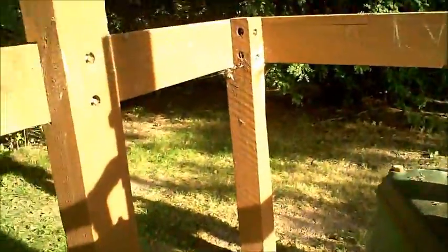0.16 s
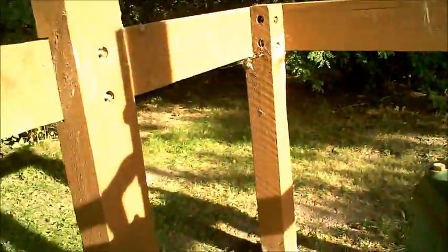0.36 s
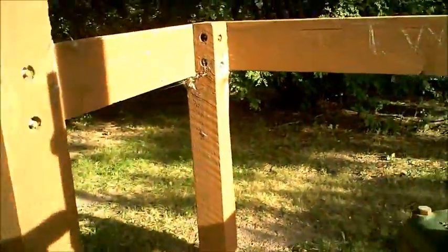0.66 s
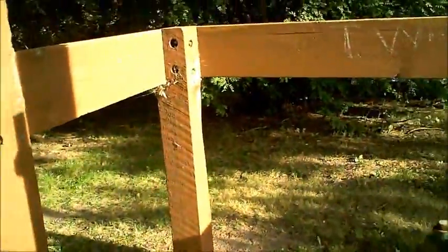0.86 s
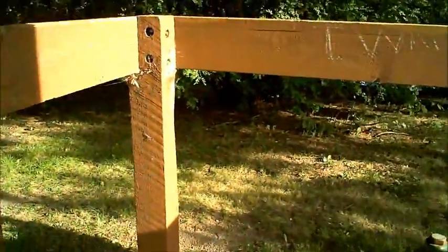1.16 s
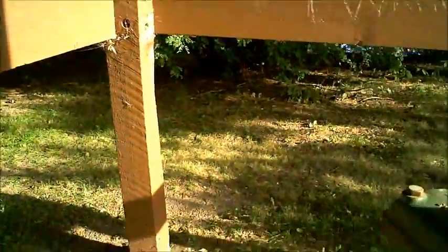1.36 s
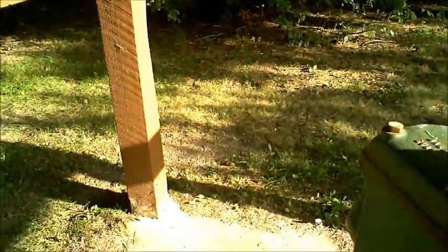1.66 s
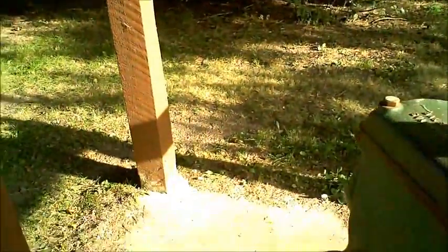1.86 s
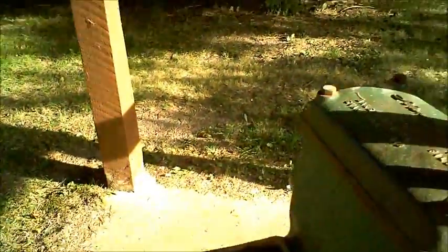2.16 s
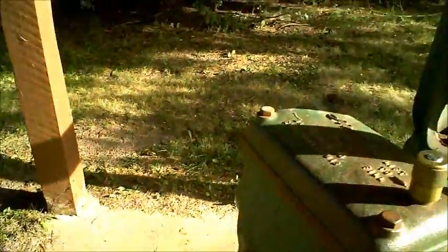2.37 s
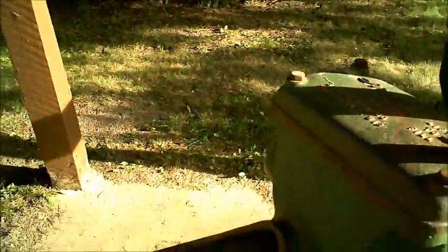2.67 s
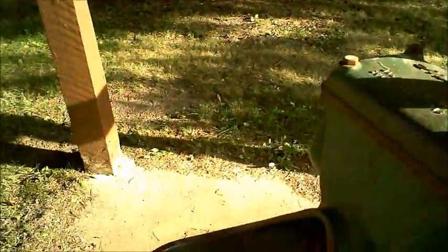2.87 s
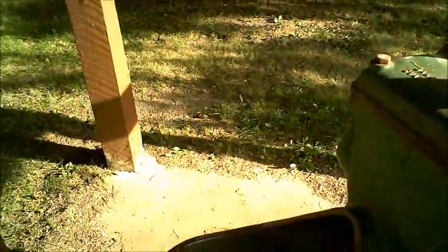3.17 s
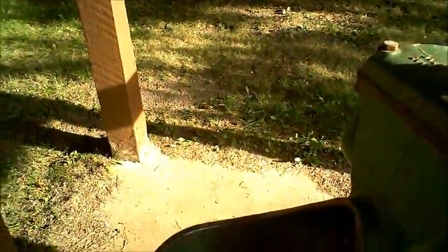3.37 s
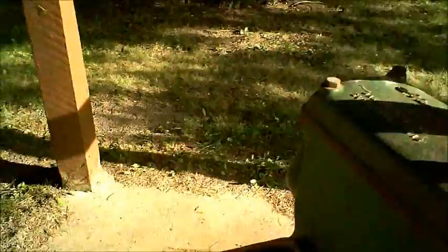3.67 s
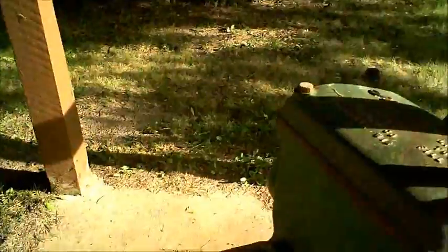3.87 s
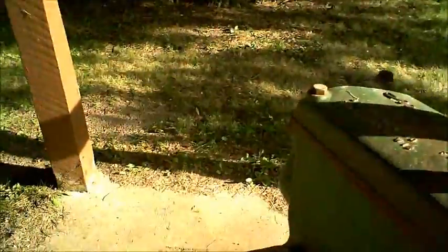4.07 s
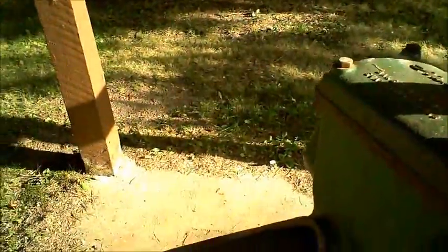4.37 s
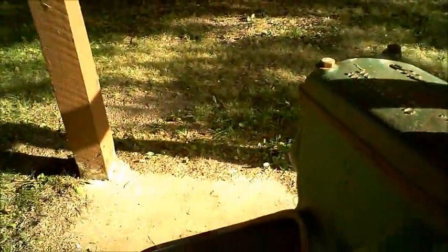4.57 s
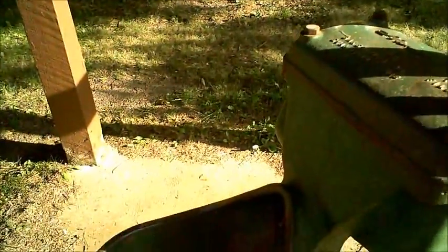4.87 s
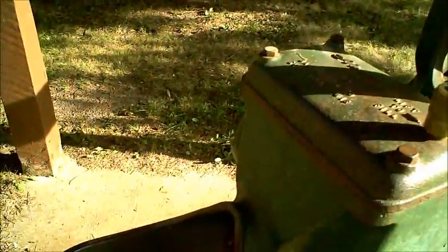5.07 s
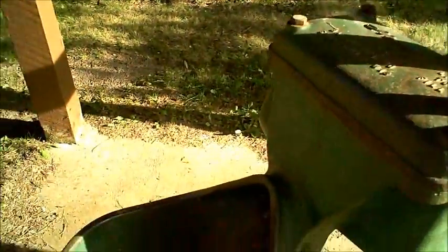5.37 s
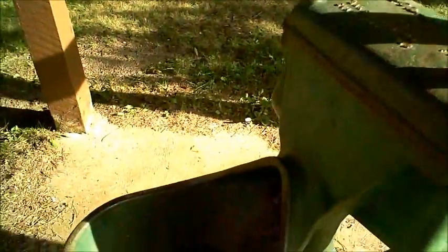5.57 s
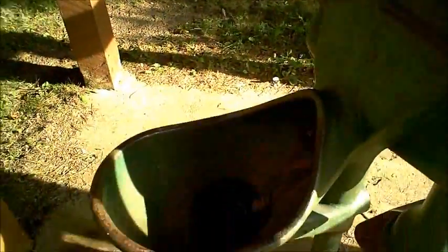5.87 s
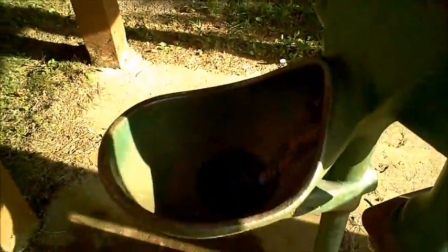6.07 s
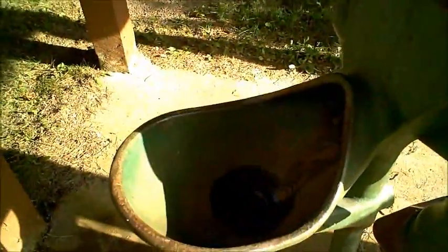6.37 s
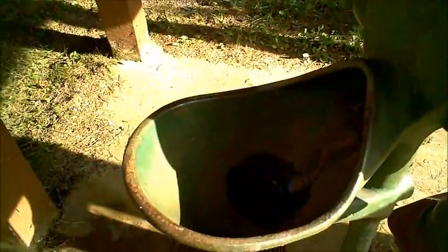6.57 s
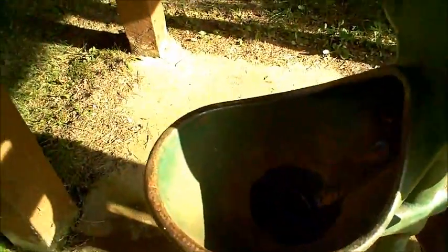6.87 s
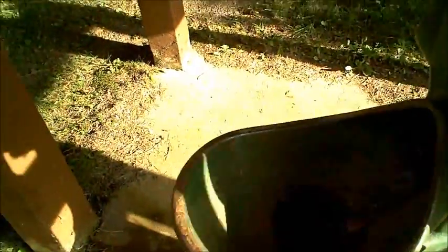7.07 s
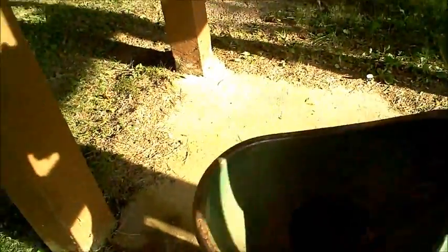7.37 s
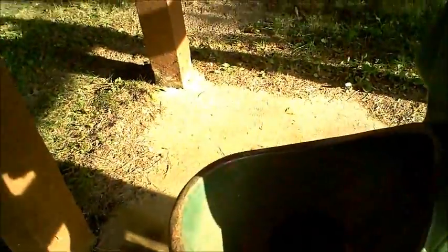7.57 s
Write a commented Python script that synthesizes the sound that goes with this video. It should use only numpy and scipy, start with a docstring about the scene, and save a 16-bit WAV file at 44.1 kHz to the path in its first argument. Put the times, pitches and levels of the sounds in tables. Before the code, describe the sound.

An old cast-iron hand pump is worked five strokes up close, its dry joints grinding, squealing and clanking in a quiet park.

```python
"""Old hand pump in a quiet park

An old cast-iron hand pump is worked close by, five full strokes. Its dry pivot and rod stick and slip:
uneven jerks shake filters for the grinding, and gliding tones make squeals and two-note groans.
The slack linkage clanks as ticks and noise bursts, and the iron housing rings as decaying modes.
Thin squeaks, a soft bump, one faint bird whistle and the still park air complete the scene."""
import sys
import numpy as np
from scipy import signal
from scipy.fft import rfft, irfft, next_fast_len
from scipy.io import wavfile
from scipy.ndimage import map_coordinates

SR = 44100
rng = np.random.default_rng(int(sys.argv[2]) if len(sys.argv) > 2 else 0)


def file_out(sig):
    """Save sig as 16-bit WAV at sys.argv[1]."""
    # one column per channel
    cols = np.atleast_2d(sig).T
    # limit, then scale
    lim = np.clip(cols, -1, 1)
    pcm = np.round(lim * 32767).astype(np.int16)
    wavfile.write(sys.argv[1], SR, pcm)


N = 340452  # length in samples
TIME = np.arange(N) / SR

# loaded strokes, in which effort builds, holds and eases off:
# start_s, full_effort_s, easing_s, end_s, level_db (before the grinding mix), rasp_pitch_hz
STROKES = [(1.351, 1.528, 1.888, 2.08, -27, 1537), (2.784, 2.996, 3.3, 3.42, -29, 1520),
           (4.106, 4.26, 4.54, 4.78, -27.5, 1410), (5.423, 5.64, 5.96, 6.175, -28.5, 1354),
           (6.807, 6.981, 7.3, 7.32, -27, 1383)]
# short rubs, mostly as the handle swings back; more bite means more rasp and less grit:
# start_s, end_s, level_db (before the grinding mix), bite_db, rasp_pitch_hz
RUBS = [(0.613, 0.736, -59, -8, 1420), (0.885, 1.122, -38.5, 4, 1460), (1.136, 1.173, -47.5, 2, 1490),
        (1.226, 1.255, -47.5, -3.5, 1440), (2.237, 2.342, -36, -7, 1370), (2.343, 2.575, -37, 2.5, 1475),
        (2.573, 2.674, -38.5, -8.5, 1460), (2.673, 2.803, -47.5, -5.5, 1390),
        (3.169, 3.223, -31, -13.5, 1370), (3.42, 3.437, -41, -1.5, 1370), (3.637, 3.668, -33.5, -7, 1340),
        (3.792, 3.917, -34.5, 6, 1473), (3.953, 4.037, -37, -7.5, 1480), (4.233, 4.292, -28.5, 1, 1550),
        (4.31, 4.331, -25, -12.5, 1500), (4.813, 4.936, -56, 4, 1330), (4.96, 5.06, -38, -6.5, 1330),
        (5.125, 5.261, -38.5, 0, 1240), (5.30, 5.344, -44.5, -3, 1280), (6.25, 6.323, -49, 4, 1320),
        (6.336, 6.466, -40.5, -6.5, 1390), (6.488, 6.608, -38.5, 1.5, 1330),
        (6.596, 6.786, -48.5, -2.5, 1290), (7.329, 7.383, -41.5, -4, 1430), (7.441, 7.555, -51, 6.5, 1380),
        (7.546, 7.723, -40, -2.5, 1370)]
# tone colour of a clank or a snapping rust flake: frequency_hz, gain_db
CLANK_COLOUR = [(150, -21.5), (600, 0), (1800, 3.5), (2600, 6), (4000, 7.5), (6000, 3), (9000, -5),
                (11500, -16.5), (16000, -59)]


def from_db(db):
    """Turn decibels into a gain."""
    return 10 ** (np.asarray(db) / 20)


def rms_one(x):
    """Scale a sound to an average power of one."""
    return x / np.sqrt(np.mean(np.abs(x) ** 2) + 1e-20)


def in_time(rows):
    """Read each column of a timed curve at every sample."""
    s, *columns = np.transpose(rows)
    return [np.interp(TIME, s, column) for column in columns]


def drift(rate, size=N):
    """Smooth random wandering that heads for a new value `rate` times a second."""
    steps = np.arange(size) * rate / SR + rng.random()
    values = rng.standard_normal(int(steps[-1]) + 3)
    return map_coordinates(values, [steps], order=2, mode="mirror")


def coloured(x, spectrum):
    """Filter with the given spectrum, without sounding ahead of its input (minimum phase)."""
    size = 2048
    hz, db = np.transpose(spectrum)
    log_hz = np.log(np.fft.rfftfreq(size, 1 / SR) + 1)
    log_gain = np.interp(log_hz, np.log(hz), np.log(from_db(db)))
    cepstrum = irfft(log_gain)[:size // 2]
    cepstrum[1:] *= 2
    response = irfft(np.exp(rfft(cepstrum, size)))
    return signal.fftconvolve(x, response)[:len(x)]


def band(x, low_hz, high_hz):
    """Keep the frequencies between two limits, with fairly steep sides."""
    limits = [low_hz, min(high_hz, .45 * SR)]
    return signal.sosfilt(signal.butter(3, limits, "band", fs=SR, output="sos"), x)


def resonance(x, hz, width_hz):
    """Two equal resonances in a row, whose centre may move; scaled to unit power."""
    turn = np.exp(2j * np.pi * np.cumsum(hz * np.ones(len(x))) / SR)
    r = np.exp(-np.pi * width_hz / SR)
    # turn the centre down to zero frequency, smooth there, then turn it back
    smooth = signal.lfilter([1], [1, -2 * r, r * r], x / turn)
    return rms_one((turn * smooth).real)


def swell(length, rise, t60):
    """Time and envelope of a vibration that builds up, is driven for `length`, then rings out."""
    t = np.arange(int((length + t60) * SR)) / SR
    ring_out = from_db(-60 * np.maximum(t - length, 0) / t60)
    return t, (1 - np.exp(-t / rise)) * ring_out


def add(out, start, sound):
    """Mix a sound in at a time in seconds."""
    i = int(start * SR)
    out[i:i + len(sound)] += sound[:max(N - i, 0)]


def park_air(level_db=-63):
    """Faint steady noise, coloured like the still air of the park."""
    # tone colour: frequency_hz, gain_db
    air_colour = [(18, -55), (30, -25), (127, -7.5), (145, 3.5), (189, -6), (526, 2.5), (702, -4), (844, 2),
                  (962, 1), (2480, -4.5), (3770, -7), (4080, -7.5), (16000, -26)]
    return from_db(level_db) * rms_one(coloured(rng.standard_normal(N), air_colour))


def knock(start=0.0195, length=0.0025, level_db=-29.5, tail_db=-11, tail_t60=0.1, low_hz=550, high_hz=1750):
    """A soft, broad bump of noise with a short tail that keeps only its lower half."""
    out = np.zeros(N)
    t, envelope = swell(length, rise=0.00083, t60=0.0077)
    bump = rms_one(band(rng.standard_normal(len(t)), low_hz, high_hz))
    add(out, start, from_db(level_db) * envelope * bump)
    t, envelope = swell(length, rise=0.0023, t60=tail_t60)
    tail = rms_one(band(rng.standard_normal(len(t)), low_hz, (low_hz + high_hz) / 2))
    add(out, start, from_db(level_db + tail_db) * envelope * tail)
    return out


def bird(start=.28, length=0.08, first_hz=3790, last_hz=3650, level_db=-66):
    """One faint whistle from the trees: a pure tone that falls slightly."""
    out = np.zeros(N)
    t, envelope = swell(length, rise=0.022, t60=0.27)
    hz = np.interp(t, [0, length], [first_hz, last_hz])
    add(out, start, from_db(level_db) * envelope * np.sin(2 * np.pi * np.cumsum(hz) / SR))
    return out


def under_load(every_s):
    """Uneven moments during the full effort of each stroke: (time, the stroke's level in dB)."""
    moments = []
    for _, full, easing, _, db, _ in STROKES:
        times = full + every_s * (np.arange(20) + rng.random(20))
        moments += [(s, db) for s in times if s < easing]
    return moments


def lock_ins(every_s=.07, length_s=0.028, detune=0.022, overtone_db=-28, rough=0.21):
    """Bearing modes catch briefly under full effort, each squeal a little out of tune."""
    # bearing modes: pitch_hz, level_db (beside the stroke's level)
    bearing_modes = [(866, -8.5), (1021, -13.5), (1250, -9), (1456, -9.5), (1770, -9.5), (2070, -12),
                     (2500, -9), (3086, -13)]
    rows = []
    for hz, mode_db in bearing_modes:
        for s, db in under_load(every_s):
            first_hz, last_hz = hz * (1 + detune * rng.standard_normal(2))
            rows.append((s, s + length_s, first_hz, last_hz, db + mode_db, overtone_db, rough))
    return rows


def squeals(wobble=0.042, flutter_db=7, falloff_db=2.5, lift_db=1, wander=0.00823, restless_db=4, ring_t60=0.028):
    """Stick and slip lock onto one mode and swell; a rough contact makes pitch and strength chatter."""
    # loudest squeals of the dry bearings: start_s, end_s, first_pitch_hz, last_pitch_hz,
    # level_db (before the common lift and swell), overtones_db (before their colour), roughness (0-1)
    loud_squeals = [(0.587, 0.608, 1386, 1360, -47, -6, .6), (0.606, 0.659, 1351, 1407, -46, -6, .55),
                    (0.654, 0.71, 1363, 1420, -39, -11, 0.32), (0.654, 0.72, 1570, 1580, -56, -4, 0.3),
                    (0.689, 0.727, 1786, 1755, -44, -12, 0.4), (0.751, 0.811, 690, 696, -56, -0.5, 0.35),
                    (0.753, 0.816, 1405, 1396, -44, -22, 0.55), (0.893, 0.928, 1600, 1554, -32, -22, 0.8),
                    (0.974, 1.045, 1456, 1297, -33.5, -14, 0.73), (1.08, 1.144, 1540, 1494, -38, -24, .8),
                    (1.535, 1.561, 887, 870, -24, -11, 0.2), (1.573, 1.62, 900, 869, -27, -6.5, 0.6),
                    (1.643, 1.69, 862, 897, -24, -4.5, 0.52), (1.752, 1.768, 1320, 1405, -23.5, -18, 0.9),
                    (1.692, 2.006, 887, 911, -39.5, -0.5, 0.27), (1.74, 1.978, 2510, 2448, -32, -3, 0.39),
                    (1.808, 1.823, 2542, 2505, -25.5, 9, 0.13), (2.228, 2.277, 1257, 1230, -35.5, 1, 0.14),
                    (2.282, 2.33, 1180, 1236, -33.5, -4, 0.33), (2.366, 2.401, 1567, 1495, -26, -16, 0.35),
                    (2.4, 2.453, 1517, 1370, -32, -10, 0.7), (2.461, 2.47, 1500, 1510, -21.5, -18.5, .45),
                    (2.483, 2.52, 1523, 1537, -31, -15, 0.8), (2.531, 2.536, 1530, 1500, -22, -24, .3),
                    (2.442, 2.622, 916, 880, -42.5, -15, 0.2), (2.937, 2.967, 1576, 1554, -26.5, -17, 0.8),
                    (3.161, 3.184, 1371, 1318, -22.5, -2.5, 0.6),
                    (3.147, 3.242, 2600, 2465, -29.5, -5, 0.6), (3.241, 3.297, 1502, 1534, -31, -20, 0.76),
                    (3.286, 3.372, 876, 888, -34.5, -10, 0.74), (3.41, 3.452, 1165, 1135, -39, -7.5, .12),
                    (3.638, 3.669, 1235, 1277, -39, 3, 0.3), (3.654, 3.722, 1363, 1302, -36, -16, 0.8),
                    (4.208, 4.218, 1524, 1484, -21, -13, 0.3), (4.31, 4.347, 882, 839, -21.5, -13, 0.36),
                    (4.351, 4.415, 893, 906, -31.5, -2.5, 0.46), (4.349, 4.377, 2470, 2525, -23.5, 2, 0.08),
                    (4.437, 4.5, 1354, 1417, -30, -7, 0.68), (4.479, 4.489, 1404, 1380, -23, -11, 0.53),
                    (4.51, 4.567, 1440, 1476, -27, -20, 0.37), (4.602, 4.644, 2470, 2540, -26, -4, 0.48),
                    (4.895, 4.956, 1330, 1300, -39, -7.5, 0.54), (5.127, 5.16, 1959, 1970, -35.5, -18, 0.6),
                    (5.156, 5.18, 1940, 1946, -31.5, -13, 0.7), (5.6, 5.62, 3130, 3035, -18.5, -24, 0.08),
                    (5.655, 5.671, 3027, 3090, -30, -21, 0.37), (5.845, 5.88, 1383, 1363, -29, -18, 0.52),
                    (5.897, 5.922, 2477, 2570, -25.5, -24, 0.2), (5.968, 5.981, 2530, 2580, -21.5, -16, 0),
                    (5.989, 6.067, 2466, 2545, -28.5, -9, 0.45), (6.217, 6.238, 1338, 1319, -32, -14, 0.4),
                    (6.238, 6.325, 1348, 1320, -43.5, -14, 0.5), (6.629, 6.696, 1310, 1252, -39.5, -9, 0.3),
                    (6.956, 7.01, 3010, 3120, -26.5, -19, 0.4), (6.996, 7.028, 2520, 2500, -28.5, -15, 0.4),
                    (7.181, 7.203, 2450, 2457, -22.5, -21, 0.3), (7.194, 7.213, 2560, 2536, -17, -9, 0.42),
                    (7.26, 7.298, 1540, 1474, -39, -14.5, 0.6), (7.33, 7.386, 3590, 3590, -30, -7, 0),
                    (7.565, 7.582, 1833, 1820, -34.5, -7, 0.3)]
    # share of the overtones that the iron passes on: frequency_hz, gain_db
    overtone_colour = [(1400, -4), (2500, 0), (3650, 0), (3800, -3), (4050, -13), (5000, -12), (5400, -17),
                       (7500, -16), (12000, -28)]
    swell_db = 3  # a squeal is this much softer at its ends than in its middle
    out = np.zeros(N)
    colour_hz, colour_db = np.transpose(overtone_colour)
    for start, end, first_hz, last_hz, db, overtone_db, rough in loud_squeals + lock_ins():
        length = max(end - start, .004)
        t, envelope = swell(length, rise=0.0024, t60=ring_t60)
        arch = np.sin(np.pi * np.minimum(t / length, 1)) - 1
        envelope = envelope * from_db(swell_db * arch)
        glide = np.interp(t, [0, length], [first_hz, last_hz])
        hz = glide * (1 + wobble * rough * drift(521, size=len(t)))
        phase = 2 * np.pi * np.cumsum(hz * (1 + wander * drift(48.2, size=len(t)))) / SR
        tone = np.sin(phase)
        for k in range(2, 6):
            partial_db = overtone_db - falloff_db * (k - 2) + np.interp(k * first_hz, colour_hz, colour_db)
            strength = from_db(partial_db + restless_db * drift(64.5, size=len(t)))
            tone = tone + strength * np.sin(k * phase)
        shake = rms_one(from_db(flutter_db * rough * np.tanh(drift(260.4, size=len(t)))))
        add(out, start, np.sqrt(2) * from_db(db + lift_db) * envelope * shake * tone)
    return band(out, 490, 8300)


def slips(per_s, spread_db):
    """Tiny uneven jerks of rusty iron sliding on iron: clicks at random times."""
    happens = rng.random(N) < per_s / SR
    return happens * rng.choice([-1, 1], N) * from_db(spread_db * rng.standard_normal(N))


def contact(start, end):
    """Gain of a contact that grips quickly, holds, and dies away after the motion stops."""
    grip_s, release_db_per_s = 0.034, 425
    grip = np.clip((TIME - start) / grip_s + .5, 0, 1)
    return grip * from_db(-release_db_per_s * np.clip(TIME - end, 0, .5))


def friction():
    """Levels (dB) of rumble, rasp, scrape and grit: sliding, strokes, rubs and thuds add in power."""
    # how the parts follow a stroke; rows are housing rumble, pivot rasp, rod scrape, rust grit:
    # start_db, full_effort_db, end_db (beside the stroke's level)
    stroke_parts = [(-17, -20, -25), (-17.5, -0.5, -21), (-11, -2.5, -24.5), (-14.5, -8.5, -32.5)]
    # dull thuds of the rod in the housing: start_s, strength_db (before the grip and the mix)
    thud_rows = [(0.945, -41), (1.04, -40), (2.589, -39.5), (3.83, -46), (3.9, -41), (5.075, -41),
                 (5.235, -42), (6.545, -35.5), (7.555, -37.5)]
    thud_s = 0.012
    # faint sliding of the slack parts once the handle moves: rumble, rasp, scrape, grit (dB)
    slide_from_s, slide_db = .73, [-64, -72, -68, -77]
    grit_db, grit_per_bite = -8.5, -0.65  # grit beside the scrape, and its change per dB of bite
    rumble_db, rumble_follows = -29, 0.59  # rumble of a rub at 0 dB, and the share of its level it follows
    sag_db = 1  # a rub fades by this much from start to end

    power = (from_db(slide_db)[:, None] * contact(slide_from_s, TIME[-1])) ** 2
    for start, full, easing, end, db, _ in STROKES:
        grip = from_db(db) * contact(start, end)
        for part, (first_db, full_db, last_db) in zip(power, stroke_parts):
            effort_db = np.interp(TIME, [start, full, easing, end], [first_db, full_db, full_db, last_db])
            part += (grip * from_db(effort_db)) ** 2  # adds into the matching row of power
    for start, end, db, bite_db, _ in RUBS:
        grip = contact(start, end) * from_db(sag_db * np.interp(TIME, [start, end], [.5, -.5]))
        levels = [rumble_db + rumble_follows * db, db + bite_db, db, db + grit_db + grit_per_bite * bite_db]
        power += np.outer(from_db(levels), grip) ** 2
    for s, db in thud_rows:
        power[0] += (from_db(db) * contact(s, s + thud_s)) ** 2
    return 10 * np.log10(power + 1e-14)


def rasp_pitch():
    """The pivot keeps one pitch through each stroke or rub, and glides in between."""
    held = [(s, hz) for start, _, easing, _, _, hz in STROKES for s in (start, easing)]
    held += [(s, hz) for start, end, _, _, hz in RUBS for s in (start, end)]
    return in_time(sorted(held))[0]


def rasp_tone(hz, width_hz=240, squash=0.89, overtone_db=-17, falloff_db=7):
    """Chaotic stick and slip: a narrow, restless vibration; friction limits its swing and adds overtones."""
    vibration = resonance(slips(per_s=1500, spread_db=3.0), hz, width_hz)
    swing = signal.hilbert(vibration, next_fast_len(N))[:N]
    phase = np.angle(swing)
    overtones = sum(from_db(overtone_db - falloff_db * (k - 1.5)) * np.cos(k * phase) for k in range(2, 5))
    return np.abs(swing) ** squash * (np.cos(phase) + overtones)


def crowded_ring(x, t60=0.04, ring_db=-1):
    """Every slip sets the same crowd of small casting modes ringing briefly."""
    t = np.arange(SR // 10) / SR
    ring = band(rng.standard_normal(len(t)) * from_db(-60 * t / t60), 1130, 19000)
    return x + from_db(ring_db) * signal.fftconvolve(x, ring / np.linalg.norm(ring))[:N]


def patchy(x, low_hz, high_hz, patch_db, count):
    """The contact point wanders and favours now these modes, now those: each band drifts in level."""
    edges = np.geomspace(low_hz, high_hz, count + 1)
    out = np.zeros(N)
    for k, (low, high) in enumerate(zip(edges, edges[1:])):
        out += (-1) ** k * band(x, low, high) * from_db(patch_db * drift(40))
    return out


def housing(force):
    """The iron modes of the housing ring under a force and die away."""
    # modes: pitch_hz, level_db, t60_s (time to fade by 60 dB)
    iron_modes = [(662, -22, 0.3), (866, -9, 0.16), (1020.5, -19, 0.42), (1356, -16, 0.2),
                  (1456, -16, 0.17), (1771, -12, 0.16), (1958, -15, 0.16), (2085, -14, .1),
                  (2480, -8.5, 0.071), (2729, -10, .09), (2869, -7, .066), (3084, -10, 0.12),
                  (3190, -14, .11), (3328, -10, .1), (3590, -5, 0.09), (3830, -6, 0.062), (4409, -13, 0.14),
                  (4950, -10, .07), (5834, -5, 0.085), (7385, -12, 0.085)]
    out = np.zeros(len(force))
    for hz, db, t60 in iron_modes:
        r, w = from_db(-60 / (t60 * SR)), 2 * np.pi * hz / SR
        strength = rng.choice([-1, 1]) * from_db(db)
        out += strength * signal.lfilter([0, np.sin(w)], [1, -2 * r * np.cos(w), r * r], force + 1e-18)
    return out


def grinding(judder_db=1.5, own_db=1.5, rasp_db=-3.0, scrape_db=-4.0, grit_db=-3.5, ring_db=-45):
    """Slips shake housing, pivot and rod; all parts judder in level together, and each a little alone."""
    # tone colour: frequency_hz, gain_db
    grind_colour = [(130, -23), (165, -13), (195, -21), (245, -7), (370, -10.5), (440, -14.5), (620, 3.5),
                    (740, -3), (900, 11), (1400, 8), (2200, -4), (2550, -1), (4600, -6), (5800, -1.5),
                    (8500, -14.5), (11500, -24.5), (16000, -25)]
    # the listener moves from the housing to the spout, where it rumbles less: time_s, rumble_db
    nearness = [(4.8, 1), (6.2, 0.5)]
    patch_db = 3.2
    rumble, rasp, scrape, grit = friction()
    judder = judder_db * drift(60)
    force = coloured(crowded_ring(slips(per_s=900, spread_db=3.0)), grind_colour)
    pivot = rasp_tone(rasp_pitch() * (1 + 0.059 * drift(70)))
    parts = [(band(force, 151, 621), rumble + in_time(nearness)[0]),
             (band(force, 775, 1145), (rumble + rasp) / 2),  # body between rumble and rasp
             (pivot, rasp + rasp_db),
             (patchy(force, 1630, 4110, patch_db, count=8), scrape + scrape_db),
             (patchy(force, 4000, 22000, patch_db, count=16), grit + grit_db)]
    direct = sum(rms_one(x) * from_db(db + judder + own_db * drift(45)) for x, db in parts)
    return direct + from_db(ring_db) * housing(direct)


def crackle(per_s=95, spread_db=6, level_db=-2.5, t60=0.034):
    """Flakes of rust snap one by one in the sliding contact, each like a tiny clank."""
    t = np.arange(SR // 20) / SR
    snaps = signal.fftconvolve(np.abs(slips(per_s, spread_db)), from_db(-60 * t / t60))[:N]
    grit = friction()[3]
    noise = rms_one(coloured(snaps * rng.standard_normal(N), CLANK_COLOUR))
    return from_db(grit + level_db) * noise  # level_db is beside the grit


def chirps(stutter_db=5, splash_db=-20):
    """A light, glancing contact whistles far up in the treble, in stuttering bursts with a little hiss."""
    # squeaks: start_s, end_s, pitch_hz, width_hz, level_db
    squeak_rows = [(0.806, 0.854, 10620, 200, -43), (0.809, .85, 10040, 302, -49),
                   (4.656, 4.695, 12680, 300, -46), (5.075, 5.105, 8620, 500, -33),
                   (5.063, 5.098, 9450, 700, -31), (5.182, 5.224, 10130, 900, -39.5),
                   (5.209, 5.213, 8950, 600, -37), (5.23, 5.245, 9700, 300, -46),
                   (5.468, 5.493, 9540, 400, -40.5)]
    out = np.zeros(N)
    for start, end, hz, width_hz, db in squeak_rows:
        t, envelope = swell(max(end - start, .005), rise=0.00062, t60=0.054)
        whistle = resonance(rng.standard_normal(len(t)), hz, width_hz)
        hiss = from_db(splash_db) * rng.standard_normal(len(t)) * envelope
        stutter = rms_one(from_db(stutter_db * drift(174, size=len(t))))
        add(out, start, from_db(db) * envelope * stutter * (whistle + hiss))
    return out


def chatter(every_s=0.022, weakest_db=-7.5, spread_db=1, treble_db=-4.5):
    """The loaded linkage slips from notch to notch in small knocks, set beside the stroke's level."""
    return [(s, db + weakest_db + spread_db * rng.random(), treble_db) for s, db in under_load(every_s)]


def blunted(x, treble_db):
    """A blunt contact loses treble: a gentle shelf changes what lies above about 1960 Hz."""
    low = signal.lfilter(*signal.butter(1, 1960, fs=SR), x)
    return low + from_db(treble_db) * (x - low)


def clanks(crack_t60=0.06, crack_db=-3, ring_db=-11, contact_t60=0.0094, tick_db=-3):
    """Each knock is a hard tick, a short crash of crowded modes, and the ring of the housing."""
    # clanks of the slack linkage, loudest or at the turns of the handle:
    # time_s, strength_db (before the mix of tick, crash and ring), treble_db
    clank_rows = [(0.8863, -29.5, -23), (1.2312, -35, -2.5), (1.36, -35.5, 4), (1.516, -15, -14),
                  (1.6308, -18, 0), (1.751, -19.5, -1.5), (1.8126, -23, -4), (1.875, -28, -2),
                  (2.131, -29, -8.5), (2.462, -28, -14), (2.562, -34, -6), (2.582, -24.5, -5),
                  (2.604, -19.5, -6), (2.651, -32, 1), (2.687, -37, 2), (2.766, -33, -6),
                  (2.793, -26.5, 0.5), (2.837, -27, 0.5), (2.8991, -19, -5.5), (2.996, -18, -4),
                  (3.067, -28, 1), (3.2917, -24.5, 0.5), (3.5213, -27, -14), (3.605, -33, -10),
                  (3.796, -24, -10), (3.9731, -26.5, 3), (4.0076, -21, 3), (4.107, -26, -2),
                  (4.1668, -28, 4), (4.2565, -21, -7), (4.312, -23, 1), (4.356, -20.5, 2.5),
                  (4.43, -24.5, 4), (4.554, -25, -13), (4.652, -31.5, 6), (4.8082, -26, -6.5),
                  (5.238, -26, 2.5), (5.3092, -32.5, 3), (5.4462, -26.5, -2.5), (5.5083, -24, 1.5),
                  (5.6197, -21, 3), (5.7854, -22, -2), (5.8441, -23, 3.5), (5.8962, -27, 2),
                  (6.212, -23.5, -1), (6.256, -28.5, -12.5), (6.329, -26, -10), (6.554, -25, -4.5),
                  (6.589, -37, 0), (6.692, -37.5, 0), (6.807, -25, 3.5), (6.843, -23.5, -1.5),
                  (6.958, -27, 1), (7.097, -18, -0.5), (7.2241, -23.5, 0), (7.455, -21, -10),
                  (7.552, -21, -13)]
    crack, force, tick = np.zeros((3, N))
    t = np.arange(SR // 5) / SR
    for s, db, treble_db in clank_rows + chatter():
        tick[int(s * SR)] = from_db(db + tick_db + treble_db)
        noise = blunted(rms_one(coloured(rng.standard_normal(len(t)), CLANK_COLOUR)), treble_db)
        add(crack, s - .001, from_db(db + crack_db - 60 * t / crack_t60) * noise)
        blow = rng.standard_normal(len(t)) * from_db(-60 * t / contact_t60)
        add(force, s - .001, from_db(db + ring_db) * blunted(blow / np.linalg.norm(blow), treble_db))
    return crack + housing(force) + band(tick, 3000, 22000)


def groans(wobble=.013, flutter_db=2.3, slip_rad=.35, rasp_db=2.2):
    """Two modes share one rubbing contact, which breeds raspy overtones and sum tones that glide with them."""
    # one curve for each groan of the rod: time_s, low_pitch_hz, high_pitch_hz, low_db, high_db, overtones_db
    groan_curves = [
        [(4.957, 781, 1313, -50, -46, -43.5), (4.985, 797, 1356, -39.5, -49, -44.5),
         (5.01, 812, 1342, -38, -33.5, -41), (5.045, 783, 1420, -35.5, -41, -43),
         (5.078, 755, 1420, -41, -42, -52)],
        [(6.329, 878, 1292, -41, -47, -37), (6.348, 895, 1322, -36, -45, -40),
         (6.362, 804, 1336, -38, -40, -42.5), (6.405, 812, 1311, -39.5, -38, -40),
         (6.44, 832, 1335, -35, -34, -41.5), (6.48, 817, 1334, -39.5, -48, -50),
         (6.53, 773, 1310, -49, -46, -53)],
        [(7.603, 769, 1500, -48, -51, -54), (7.622, 771, 1555, -36.5, -43, -42.5),
         (7.652, 803, 1534, -44, -50, -41), (7.68, 780, 1390, -35.5, -28, -48.5),
         (7.722, 751, 1320, -36, -37, -45)],
    ]
    # overtones: low_multiple, high_multiple (how many times each note's frequency is counted)
    overtone_orders = [(2, 0), (1, 1), (3, 0), (2, 1), (4, 0), (3, 1), (5, 0), (4, 1), (6, 0), (5, 1),
                       (7, 0)]
    # one level for each overtone: level_db (beside the curve's overtones_db)
    overtone_levels = [1.5, -3, 1.5, 0.5, -4, -3, -7, -12, -14, -15, -17]
    out = np.zeros(N)
    for curve in groan_curves:
        s, *columns = np.transpose(curve)
        t, envelope = swell(s[-1] - s[0], rise=0.0034, t60=0.025)
        low_hz, high_hz, low_db, high_db, overtones_db = (np.interp(s[0] + t, s, c) for c in columns)
        low, high = (2 * np.pi * np.cumsum(hz * (1 + wobble * drift(279, size=len(t)))) / SR
                     for hz in (low_hz, high_hz))
        partials = [(low, low_db), (high, high_db)]
        for (a, b), db in zip(overtone_orders, overtone_levels):
            offset = 2 * np.pi * rng.random() + slip_rad * drift(198, size=len(t))
            partials.append((a * low + b * high + offset, overtones_db + db))
        tone = sum(from_db(db + flutter_db * drift(73.4, size=len(t))) * np.sin(phase)
                   for phase, db in partials)
        rasp = rms_one(from_db(rasp_db * drift(396, size=len(t))))
        add(out, s[0], np.sqrt(2) * envelope * rasp * tone)
    return out


def pips(pitch_hz=8640, length_s=0.0013, t60=0.0089, detune=0.019, splash_db=-19):
    """Each jerk of the glancing contact drives a high whistle for a moment."""
    # sharp pips in the loudest high squeak: start_s, level_db (before the build-up)
    pip_rows = [(5.0702, -14), (5.0775, -22), (5.083, -23), (5.091, -24), (5.096, -25)]
    out = np.zeros(N)
    t, envelope = swell(length_s, rise=.0005, t60=t60)
    for s, db in pip_rows:
        whistle = np.sin(2 * np.pi * pitch_hz * (1 + detune * rng.standard_normal()) * t)
        hiss = from_db(splash_db) * band(rng.standard_normal(len(t)), 7000, 16000)
        add(out, s, np.sqrt(2) * from_db(db) * envelope * (whistle + hiss))
    return out


def shelter(x, t60=0.21, wet_db=-17):
    """Faint, dull scatter from the posts, slab and trees around: a fading noise echo."""
    t = np.arange(SR // 2) / SR
    echo = band(rng.standard_normal(len(t)), 113, 2430) * from_db(-60 * t / t60) * (t > .006)
    return x + from_db(wet_db) * signal.fftconvolve(x, echo / np.linalg.norm(echo))[:N]


def scene():
    """The pump, too small to radiate much bass, over the still air of the park."""
    pump = grinding() + crackle() + clanks() + squeals() + groans() + chirps() + pips()
    slab_thud = from_db(-4.5) * band(pump, 6.6, 90)  # a faint thud comes through the slab
    pump = band(pump, 127, 19000) + slab_thud
    return (shelter(pump) + knock() + bird() + park_air())[None]


def record(dry):
    """Cut the top steeply above 16.1 kHz."""
    return signal.sosfilt(signal.ellip(10, .1, 70, 16100, fs=SR, output="sos"), dry)


dry = scene()
out = record(dry)
file_out(out)
```